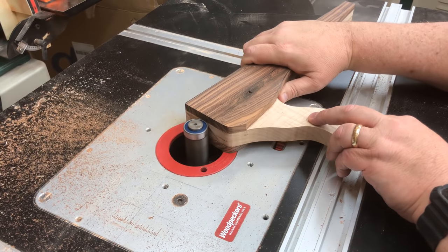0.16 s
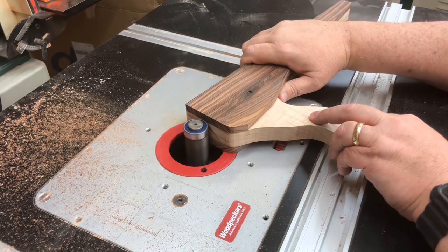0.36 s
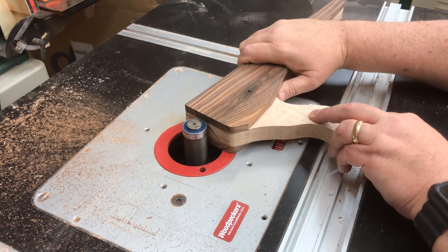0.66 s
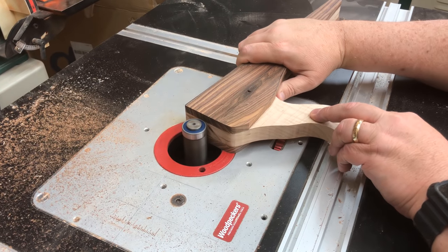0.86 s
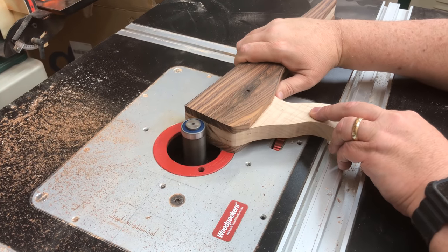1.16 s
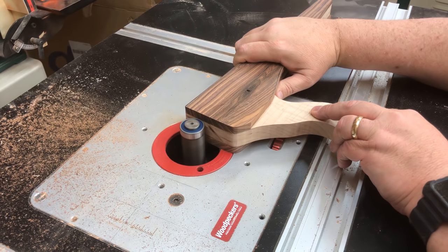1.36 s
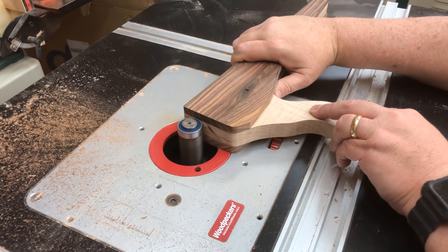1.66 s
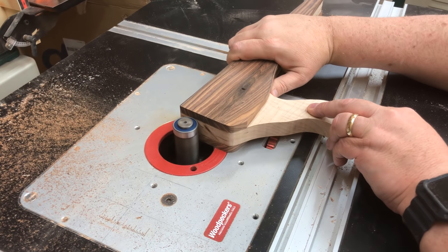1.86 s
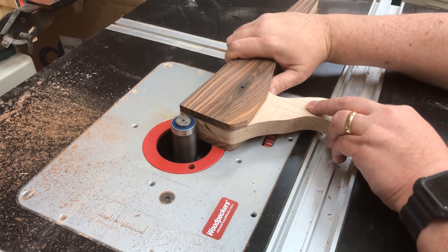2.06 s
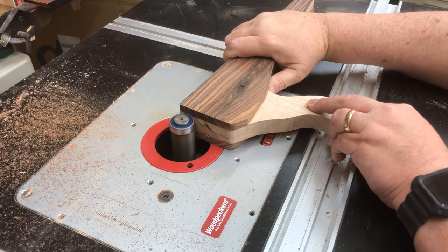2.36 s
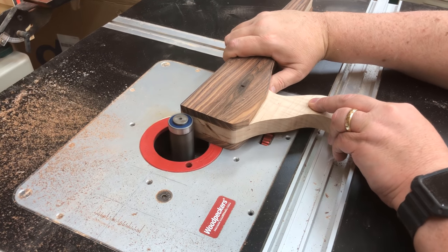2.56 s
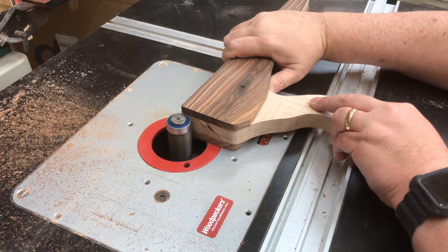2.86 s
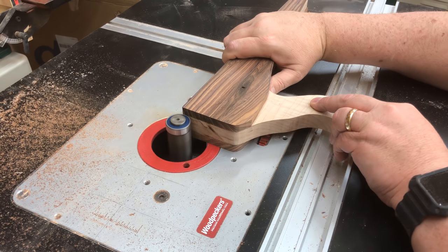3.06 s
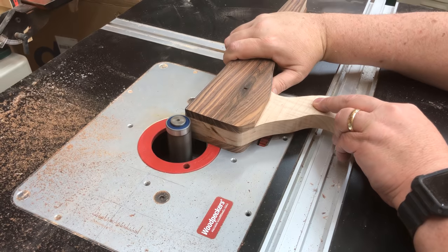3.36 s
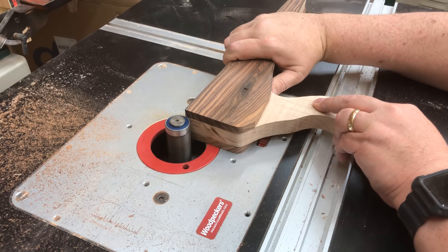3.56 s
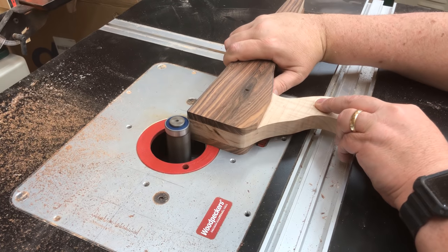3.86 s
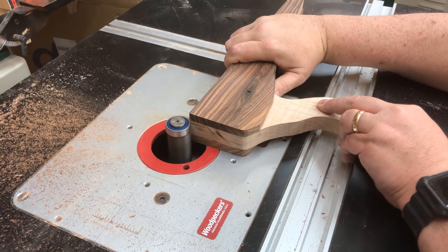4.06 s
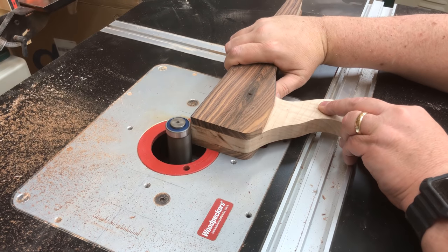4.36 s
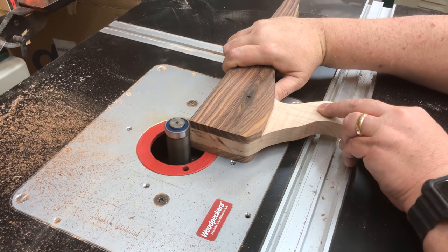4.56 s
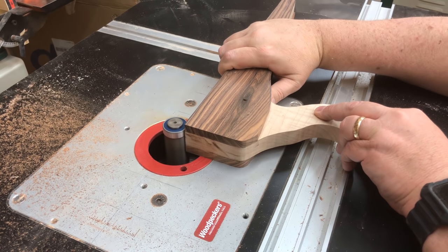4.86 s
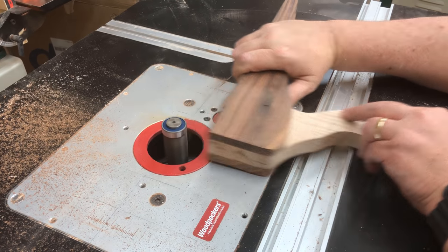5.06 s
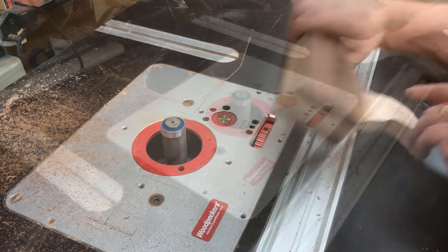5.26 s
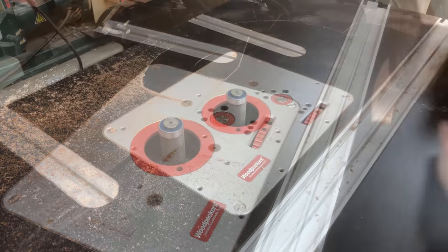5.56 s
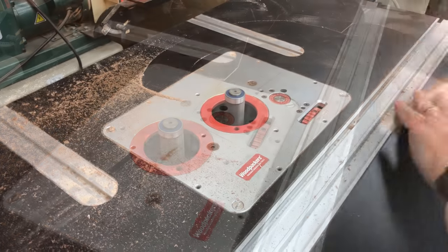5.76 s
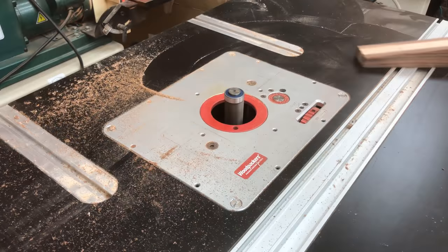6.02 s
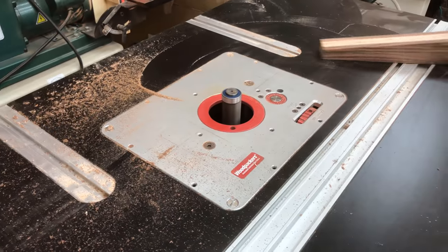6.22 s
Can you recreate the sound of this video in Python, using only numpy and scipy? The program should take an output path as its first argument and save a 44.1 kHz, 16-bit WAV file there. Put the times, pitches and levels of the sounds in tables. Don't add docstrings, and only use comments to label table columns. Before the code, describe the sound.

A table-mounted router runs continuously, heard close and nearly mono in a workshop. Its hard, buzzing whine sits on a low tone with bright overtones, wrapped in rushing air and fine chip hiss. Under light cutting the pitch creeps up as the load eases and the wood is lifted away. Near the end a quick edit brings the same tool running free, slightly higher and a little smoother.

```python
import sys
import numpy as np
from scipy import signal
from scipy.fft import rfft, irfft, next_fast_len
from scipy.io import wavfile
from scipy.ndimage import uniform_filter1d

SR = 44100
rng = np.random.default_rng(int(sys.argv[2]) if len(sys.argv) > 2 else 0)


def int16_out(signal):
    q = np.round(np.clip(np.atleast_2d(signal).T, -1, 1) * 32767)
    wavfile.write(sys.argv[1], SR, q.astype(np.int16))


def rack_gain(trim_db):
    fader = np.asarray(trim_db, float)
    return 10 ** (fader / 20)


N = 281799
EDIT_S = 5.584
RIPPLE_HZ, BEARING_RATIO = 120, 0.4175

# start_s, shaft_hz
SHAFT_SPEED = [(0, 348.2), (.4, 347.9), (1.2, 348.6), (2.3, 350.4), (3.2, 351.4), (3.95, 354), (4.3, 354.9),
               (4.95, 355.5), (5.35, 356.4), (5.584, 356.6), (5.585, 360.4), (5.9, 360.9), (6.39, 361)]
# heavy_cut_hz, medium_cut_hz, light_cut_hz, free_hz
STATE_SPEEDS = [348.3, 351, 355, 360.4]
# order, heavy_cut_db, medium_cut_db, light_cut_db, free_db
SHAFT_ORDERS = [(1, -41.5, -41.5, -40.5, -39.5), (2, -51, -52.5, -48, -49), (3, -46, -46.5, -44.5, -53),
                (4, -52, -66, -49, -44.5), (5, -45.5, -46.5, -39.5, -40.5), (6, -44.6, -47, -50.5, -47),
                (7, -54.5, -59.5, -69, -56.5), (8, -66, -56, -56, -57), (9, -48, -48.5, -59.5, -64),
                (10, -58, -47, -66, -69), (11, -58, -55.5, -61, -66), (12, -52.5, -45.5, -48.5, -51),
                (24, -66, -58, -55, -64)]
# centre_s, order, change_db, half_length_s
REFLECTIONS = [(.1, 5, -5.5, .4), (1.1, 4, -6, .3), (1.35, 9, 3.5, .35), (1.4, 2, -9, .55),
               (1.6, 5, 1.5, 0.22), (1.6, 7, -12, .55), (1.8, 8, -8, .55), (3.45, 9, -14, 0.099),
               (3.5, 5, 5, 0.21), (3.65, 6, 4, .3), (3.646, 10, -10, .3), (3.72, 9, 8.5, 0.14),
               (3.8, 11, -9, .35), (4.0, 7, 9, .25), (4.05, 2, 3.5, 0.37), (4.0, 24, 5, 0.45),
               (4.2, 9, 7, .15), (4.22, 6, -9, .15), (4.25, 3, 3.5, .3), (4.45, 5, -7, 0.22),
               (4.5, 4, 4, .2), (4.7, 3, -3, .15), (4.95, 24, -11, 0.19), (5.2, 12, -0.5, .1),
               (5.4, 5, -10.5, 0.17), (5.45, 3, -2, 0.18), (5.4, 9, -9, .3), (5.35, 1, 2, 0.4),
               (5.92, 3, -9, .17), (6.1, 12, -8, 0.1)]
# order, loaded_db, free_db
FAINT_ORDERS = [(13, -66, -72), (14, -62.5, -61), (15, -62, -58), (16, -61.5, -70), (22, -68, -71),
                (36, -68, -67)]
# order, ripple_steps, loaded_db, free_db
RIPPLE_TONES = [(0, 2, -67, -67), (1, 2, -63.5, -67), (2, 1, -58, -63), (2, 2, -56.5, -80),
                (3, -2, -63, -75), (3, -1, -58, -79), (3, 2, -62, -60), (4, -1, -56.5, -75),
                (4, 1, -61, -70), (4, 2, -61, -67), (5, -2, -52.5, -75), (5, -1, -68, -75),
                (5, 1, -58, -55), (5, 2, -52, -80), (6, -2, -54, -75), (6, -1, -67, -80),
                (6, 2, -60.5, -78), (7, -1, -69, -80), (8, 1, -56, -80), (8, 2, -63, -80),
                (9, -2, -60, -80), (9, -1, -55, -80), (9, 1, -56, -65), (10, -2, -62, -73),
                (10, -1, -56, -59), (10, 1, -58, -67), (11, -2, -62, -70), (11, 1, -62, -70),
                (12, 1, -60, -72)]
# order, bearing_steps, loaded_db, free_db
BEARING_TONES = [(0, 1, -64, -58), (1, -1, -60, -62), (1, 1, -60, -68), (2, 1, -64, -75),
                 (3, -1, -57, -56.5), (3, 1, -64, -57), (4, -1, -49, -60), (4, 1, -56.5, -56.5),
                 (5, -1, -50.5, -51.5), (5, 1, -55.5, -56), (6, -1, -63, -70), (6, 1, -63, -57),
                 (7, -1, -60, -59), (8, 1, -67, -60), (10, -1, -70, -71), (5, -2, -60, -62),
                 (5, 2, -58, -66), (4, -2, -85, -71)]
# heavy_cut_db, medium_cut_db, light_cut_db, free_db
RIPPLE_DEPTH = [-3, 0.7, -10, -2.2]
# heavy_cut_db, medium_cut_db, light_cut_db, free_db
BEARING_DEPTH = [-8.5, -18, -0.6, 0]
# heavy_cut_db, medium_cut_db, light_cut_db, free_db
AIR_BANDS = [
    (0.6, 1.8, 1.5, .3),
    (-1.6, -2.1, -0.98, -1.6),
    (0.6, 0.22, 0.97, .3),
    (-0.24, 0.22, .7, .6),
]
LIFT_AIR = [.3, -.2, -0.79, -1]
BAND_EDGES = [700, 2450, 4650]
# flicker_db, ripple_throb_share, turn_throb_share
AIR_THROB = [
    (1.4, 0.022, .02),
    (0.86, 0.099, 0.069),
    (.5, 0.077, 0.14),
    (0.4, .04, .06),
]
# frequency_hz, density_db (per Hz)
AIR_COLOUR = [
    [(30, -87), (150, -82), (300, -81.5), (420, -83.5), (700, -80), (1300, -75.5), (2000, -76.5),
     (2450, -79.5), (4600, -81), (6500, -81.5), (9000, -82), (11300, -85.5), (14000, -88.5), (15500, -97.5)],
    [(30, -91), (150, -80), (300, -79), (450, -82), (700, -76.5), (1300, -78.5), (2000, -77.5),
     (2500, -80.5), (4600, -81), (6400, -85.5), (8000, -85), (10500, -85), (12500, -89), (15500, -99)],
]
# centre_hz, width_hz, density_db (per Hz)
RESONANCES = [
    [(998, 170, -72.5), (1510, 140, -79.5), (1860, 250, -83.5), (3146, 460, -72.5), (3520, 410, -74),
     (3920, 390, -76.5), (4300, 300, -77.5), (5000, 300, -84.5), (5810, 590, -80.5), (7570, 500, -85.5),
     (8540, 500, -83.5), (10300, 750, -84.5), (9060, 450, -85), (11900, 400, -87), (12500, 600, -86.5),
     (13400, 500, -85)],
    [(1240, 180, -73), (1570, 310, -73.5), (1900, 140, -83), (3330, 360, -74), (3600, 250, -79),
     (3970, 380, -76), (4320, 200, -77), (5080, 400, -80.5), (5960, 400, -82), (7300, 600, -83),
     (8700, 300, -82), (10300, 600, -88)],
]
# start_s (middle of the patch), low_hz, further_bands (count)
STEREO_PATCHES = [(.1, 5600, 0), (.495, 4600, 1), (.52, 13700, 0), (.565, 9600, 0), (1.19, 8900, 2),
                  (1.354, 5600, 1), (1.957, 10900, 0), (2.004, 5600, 1), (2.12, 9600, 0), (3.42, 11600, 0),
                  (3.583, 5600, 0), (3.722, 11000, 1), (3.908, 11000, 0), (3.931, 8900, 1),
                  (4.349, 13000, 0), (4.395, 11700, 1), (4.627, 4100, 0), (4.999, 10300, 1),
                  (5.115, 4100, 1), (5.278, 5100, 0), (5.719, 13000, 0), (5.835, 11700, 0),
                  (5.881, 11300, 0), (5.951, 7500, 0), (6.09, 5600, 1), (6.206, 8900, 1), (6.276, 13000, 0),
                  (6.346, 5100, 1)]


def whine(turn, shaft_hz, after):
    opposed = {2: np.pi, 4: np.pi}
    t = np.arange(0, N + 64, 64) / SR
    out = np.zeros(N)
    for order, *state_db in SHAFT_ORDERS:
        mirror_db = 0 * t
        for centre_s, mirrored_order, change_db, half_s in REFLECTIONS:
            if mirrored_order == order:
                same_scene = (t > EDIT_S) == (centre_s > EDIT_S)
                mirror_db += change_db * np.exp(-((t - centre_s) / half_s) ** 2) * same_scene
        db = by_state(shaft_hz, after, state_db) + np.interp(np.arange(N) / SR, t, mirror_db)
        phase = order * turn + opposed.get(order, 0)
        out += tone(phase, db, waver_db=0.28 + 0.067 * order, smear=0.025 * order)
    for order, loaded_db, free_db in FAINT_ORDERS:
        out += tone(order * turn, np.where(after, free_db, loaded_db), waver_db=2.7, smear=0.74)
    return out


def side_tones(turn, table, step, depth_db, after):
    out = np.zeros(N)
    for order, steps, loaded_db, free_db in table:
        db = np.where(after, free_db, loaded_db) + depth_db + 1.7 * walk(3.9)
        start_phase = 2 * np.pi * rng.random()
        phase = order * turn + steps * step + start_phase + 1.14 * walk(3)
        out += np.sqrt(2) * rack_gain(db) * np.sin(phase)
    return out


def loose_bearing(turn, lifted):
    return lifted * tone(BEARING_RATIO * turn, db=-55.5, waver_db=1.2, smear=0.27)


def air(turn, ripple, levels_db, after):
    size = next_fast_len(N)
    hz = np.arange(size // 2 + 1) * SR / size + 1e-3
    white = rfft(rng.standard_normal(size)) * np.sqrt(SR / 2)
    below = [0 * hz] + [1 / (1 + (hz / edge) ** 12) for edge in BAND_EDGES] + [1 + 0 * hz]
    shapes = []
    for colour, rings in zip(AIR_COLOUR, RESONANCES):
        colour_hz, colour_db = np.transpose(colour)
        power = rack_gain(np.interp(np.log(hz), np.log(colour_hz), colour_db)) ** 2
        for centre_hz, width_hz, db in rings:
            power += rack_gain(db) ** 2 / (1 + (2 * (hz - centre_hz) / width_hz) ** 2) ** 2
        shapes.append(np.sqrt(power))
    out = np.zeros(N)
    shared = walk(9)
    for k, (flicker_db, by_mains, by_turn) in enumerate(AIR_THROB):
        band = below[k + 1] - below[k]
        loaded, free = (irfft(white * shape * band, size)[:N] for shape in shapes)
        throb = 1 + by_mains * np.cos(ripple) + by_turn * np.cos(turn)
        level = rack_gain(levels_db[k] + flicker_db * walk(20) + 0.25 * shared)
        out += np.where(after, free, loaded) * throb * level
    return out


def mains_hum(ripple):
    return tone(ripple, db=-68.5, waver_db=4.8, smear=0.13)


def bench_rumble():
    band = signal.butter(2, [45, 90], "band", fs=SR, output="sos")
    return rack_gain(-53.5) * signal.sosfilt(band, rng.standard_normal(N))


def stereo_patches():
    hop, grid = 1024, 295
    width_hz, top_hz = 1400, 13700
    level_db, tilt_db = -47.5, -0.82
    out = np.zeros(N + 4096)
    window = signal.windows.cosine(2 * hop)
    time = np.arange(2 * hop) + 0.5 + hop / 2
    for start_s, first_hz, more in STEREO_PATCHES:
        room_hz = max(top_hz - first_hz - width_hz, 0)
        further_hz = first_hz + width_hz + rng.random(more) * room_hz
        start = grid + hop * round((start_s * SR - hop - grid) / hop)
        for low_hz in [first_hz, *further_hz]:
            bins = np.arange(low_hz, low_hz + width_hz, SR / 2 / hop) * 2 * hop // SR
            waves = np.cos(np.pi / hop * np.outer(bins + 0.5, time))
            patch = rng.standard_normal(len(bins)) @ waves
            level = rack_gain(level_db + tilt_db * (low_hz / 1000 + 1.5))
            out[start:start + 2 * hop] += level * window * patch / patch.std()
    return out[:N]


def walk(rate):
    k = int(SR / rate / 64)
    coarse = np.repeat(rng.standard_normal(N // 64 // k + 2), k)
    coarse = uniform_filter1d(uniform_filter1d(coarse, k), k)
    return 1.3 * np.interp(np.arange(N) / 64, np.arange(len(coarse)), coarse)


def tone(phase, db, waver_db, smear):
    return np.sqrt(2) * rack_gain(db + waver_db * walk(14)) * np.cos(phase + smear * walk(20))


def by_state(shaft_hz, after, db):
    return np.where(after, db[-1], np.interp(shaft_hz, STATE_SPEEDS[:-1], db[:-1]))


def scene():
    t = np.arange(N) / SR
    after = t > EDIT_S
    shaft_hz = np.interp(t, *np.transpose(SHAFT_SPEED))
    lift_s, lift_length_s = 4.8, 0.32
    lifted = np.clip((t - lift_s) / lift_length_s, 0, 1) * ~after
    ripple_db = by_state(shaft_hz, after, RIPPLE_DEPTH) + 0.3 * lifted
    bearing_db = by_state(shaft_hz, after, BEARING_DEPTH) - 0.5 * lifted
    air_db = [by_state(shaft_hz, after, db) + lift_db * lifted for db, lift_db in zip(AIR_BANDS, LIFT_AIR)]
    turn = 2 * np.pi * np.cumsum(shaft_hz) / SR + 2.195 * after
    ripple = 2 * np.pi * RIPPLE_HZ * t

    tool = side_tones(turn, RIPPLE_TONES, ripple, ripple_db, after)
    tool += side_tones(turn, BEARING_TONES, BEARING_RATIO * turn, bearing_db, after)
    tool += loose_bearing(turn, lifted)
    tool += air(turn, ripple, air_db, after)
    tool += mains_hum(ripple)
    mic_low_cut = signal.butter(8, 108.5, "high", fs=SR, output="sos")
    tool = signal.sosfilt(mic_low_cut, tool) + bench_rumble()
    tool += whine(turn, shaft_hz, after)
    fade_from, fade_in_s = 0.049, 0.02
    tool *= np.where(after, np.clip(fade_from + (t - EDIT_S) / fade_in_s, 0, 1), 1)
    side = stereo_patches()
    return np.array([tool + side, tool - side])


def top_cut(x):
    return signal.sosfilt(signal.butter(12, 15680, fs=SR, output="sos"), x)


def record(dry):
    ceiling = 0.18
    mix = ceiling * np.tanh(dry / ceiling)
    return top_cut(mix)


dry = scene()
out = record(dry)
int16_out(out)
```